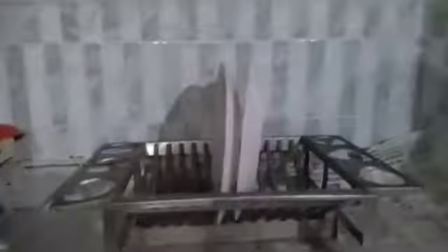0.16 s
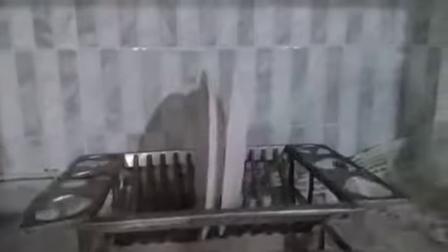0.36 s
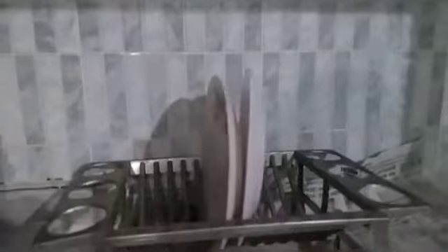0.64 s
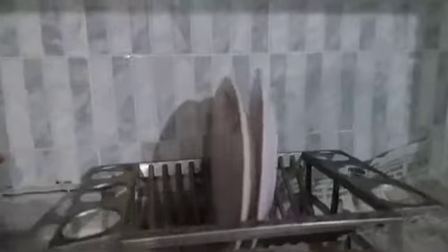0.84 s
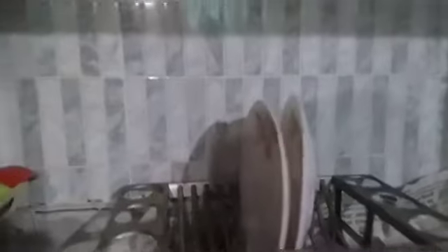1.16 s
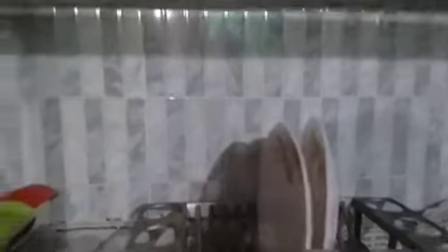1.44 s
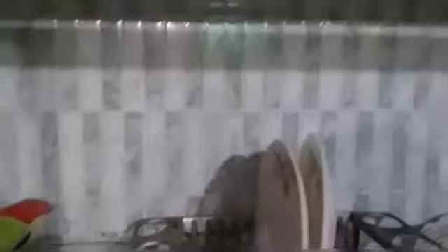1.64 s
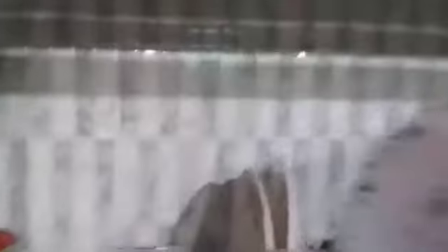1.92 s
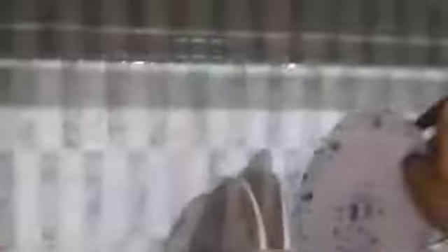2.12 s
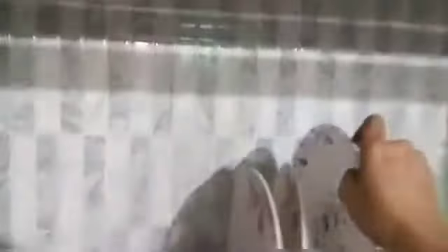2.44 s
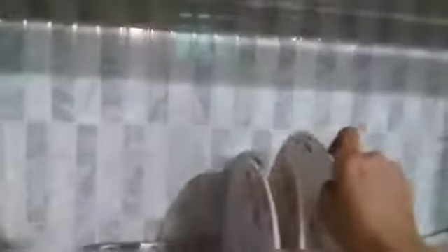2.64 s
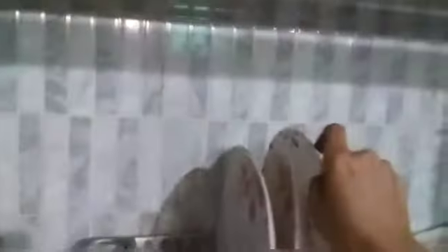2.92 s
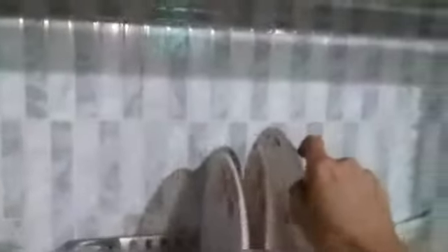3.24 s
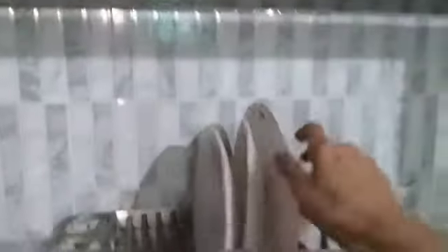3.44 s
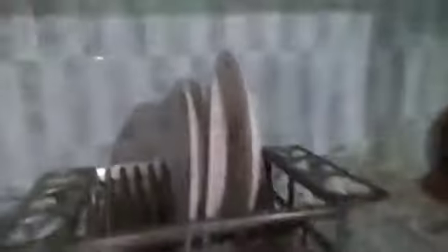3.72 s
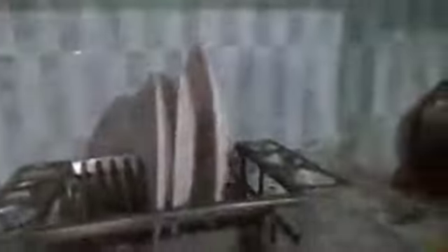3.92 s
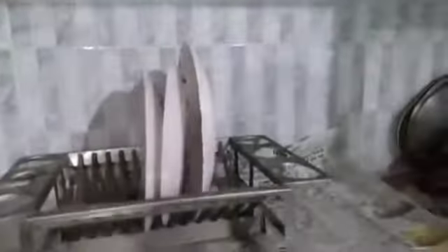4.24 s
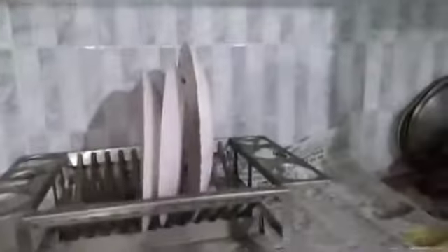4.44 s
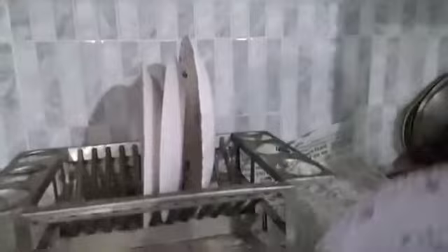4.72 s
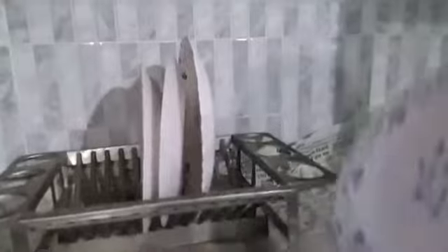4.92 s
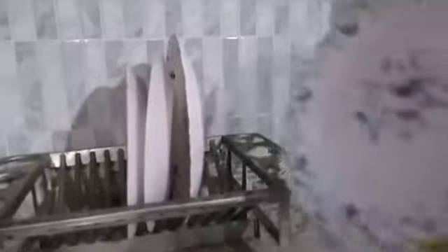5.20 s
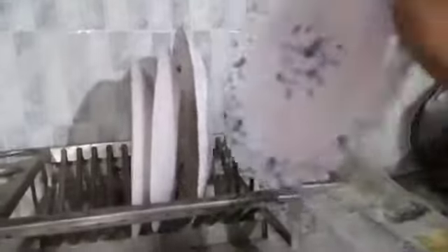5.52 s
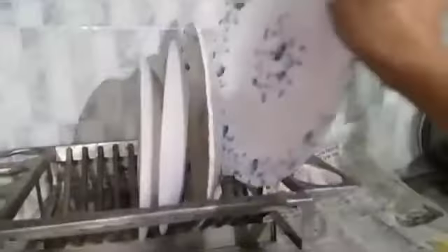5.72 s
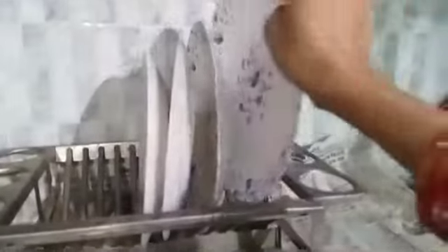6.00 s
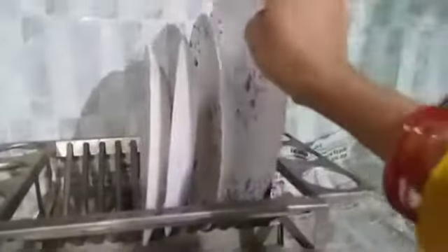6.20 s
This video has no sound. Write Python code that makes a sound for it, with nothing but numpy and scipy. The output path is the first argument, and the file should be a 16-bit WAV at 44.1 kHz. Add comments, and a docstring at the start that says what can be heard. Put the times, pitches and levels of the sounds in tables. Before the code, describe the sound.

China plates clatter and scrape into a steel dish rack in a small kitchen, with light clinks of glass bangles.

```python
"""Racking plates in a small tiled kitchen

Close up, plates come off a pile and go into a steel rack. China, steel and glass bangles clink:
each knock chatters briefly and rings the piece's modes. Wet plates scrape in dense little slips.
Far off are hollow thuds, a horn and a few faint tones, over town murmur and a low hum."""
import sys
import numpy as np
from scipy import signal
from scipy.fft import rfft, irfft, next_fast_len
from scipy.io import wavfile
from scipy.ndimage import uniform_filter1d

SR = 44100
rng = np.random.default_rng(int(sys.argv[2]) if len(sys.argv) > 2 else 0)


def store_wav(level_fs):
    """Save 16-bit WAV to argv[1]."""
    pcm = np.round(np.clip(np.atleast_2d(level_fs), -1, 1) * 32767)
    wavfile.write(sys.argv[1], SR, pcm.T.astype(np.int16))


N = 280764

# spectrum of the murmur and hiss: frequency_hz, relative_db
AIR_SPECTRUM = [(12, -54), (20, -30.5), (59, -13), (92, 0), (208, -16.5), (238, -12), (618, -12),
                (769, -21), (2160, -28), (3080, -29.5), (3830, -29.5), (12400, -37.5), (13400, -30.5)]
# noise bands of the hum: centre_hz, width_hz, level_db
HUM_BANDS = [(100.9, 30, -64.5), (149, 14, -67), (204.6, 20, -65.5)]
# light knocks: start_s, peak_db, ring_over_clatter_db, clatter_tilt_db_per_octave
BANGLE_HITS = [(0.0428, -43, 3, 5), (0.0641, -27, 8, 1), (0.5077, -19, 3.1, 4), (0.531, -17, 5, 1.5),
               (0.7175, -36, 3, 5), (1.9909, -50, 12.5, -7.5), (5.3426, -40, 16, -3.7),
               (5.3599, -39.5, -5.4, 1.7), (5.393, -34, 4, 1.5)]
STEEL_HITS = [(0.2614, -49, -21, 7), (0.311, -45, -21, 7), (0.3621, -39, -23, 8), (0.4244, -50, -17, -35),
              (0.4823, -32, 2, 7), (0.8069, -19, -4.5, -0.9), (0.821, -8, -3, 1.7),
              (0.9005, -18.5, -3, -1.13), (0.9453, -20, -4, -1.5), (1.0587, -31.5, -4.5, -0.1),
              (3.8942, -60.5, 4, -0.5), (4.8552, -34, -7, 0.5), (4.9821, -31.5, -8, 1.3)]
SAUCER_HITS = [(1.199, -9.5, 4.9, -0.6), (1.26, -8, 1.7, -4), (1.34, -19, 1.1, -4.5),
               (1.371, -12.5, 0.15, -4), (3.349, -36, -2.5, -4), (3.362, -34, 2, -3),
               (3.387, -37, -0.5, -5.5)]
RIM_HITS = [(4.236, -32.5, 8.5, -2.5), (4.248, -36.5, -0.5, -6.5), (4.387, -48, 6, 3)]
# knocks on damped plates: the same four columns, then favoured_mode_hz, ring_time_ratio
PILE_HITS = [(1.41, -2, 3.8, -4, 3500, 0.26), (1.426, -2, -3.3, -3, 3460, 0.8),
             (1.442, 0, 1.3, -9, 2180, 0.14), (1.474, -5.5, 7, -2, 1120, 0.33),
             (1.489, -6.5, -8, -5.5, 910, 0.9), (1.529, -11, 2, -5, 1950, 0.54),
             (1.593, -14.5, -2, -7, 3280, 0.4), (1.636, -10.5, 0.5, -5, 3120, 0.33),
             (1.704, -15.5, 3.5, -4, 1945, 0.82), (4.446, -31.5, -3.5, -9.5, 1105, 0.34),
             (4.619, -24, -1.5, -6.5, 1120, 0.3)]
LARGE_PLATE_HITS = [(2.83, -11.5, -0.5, -2, 3550, 0.85), (2.933, -17.5, -2.5, -4.5, 1960, 0.4),
                    (2.978, -16.5, 1, -4, 205, 0.27), (5.9995, -8.5, 7.5, 0.5, 1105, 0.68),
                    (6.103, -9.5, 7.5, -1.5, 1105, 0.85), (6.169, -4.5, 1.5, -2.5, 1960, 0.26),
                    (6.219, -12.5, -5, -5, 1960, 0.5), (6.286, -18, 0.5, -5, 1960, 0.5),
                    (6.337, -19.5, 3, -5.5, 1960, 0.33)]
# ringing modes of each piece: pitch_hz, relative_db, free_t60_s
BANGLE_MODES = [(4660, -7, 0.054), (7650, -2, 0.035), (7780, 3, 0.038), (8280, 5.5, 0.099), (9060, -5, .06),
                (9130, -0.5, 0.052), (12400, 7, 0.1), (12610, 1.5, 0.054)]
STEEL_MODES = [(2114, -5.5, 0.087), (4180, -2.5, 0.089), (5300, 4.5, .04), (8250, -4, 0.036),
               (8980, -3, 0.092), (11220, -13.5, 0.044)]
SAUCER_MODES = [(224, -15, 0.18), (776.8, -3.5, 0.087), (976, -7, 0.096), (1528, 7.5, 0.017),
                (2060, -2, 0.05), (2670, -7, 0.055), (3438, -5, .05), (4150, -7.5, .04), (4947, -2, .04),
                (5540, -13, 0.049)]
PILE_MODES = [(129, -20.5, 0.17), (219, -16, 0.16), (694, -19.5, .15), (873, -10, 0.15), (1137, -8, 0.27),
              (1536, -10, 0.17), (1982, -3, 0.18), (2200, -7.5, 0.14), (2588, -9.5, .12), (2870, -6, 0.077),
              (3096, -1.5, 0.15), (3357, -1, 0.044), (3677, -8.5, 0.11), (4157, -4.5, 0.17),
              (4740, -3.5, .12), (5620, -8, 0.073)]
LARGE_PLATE_MODES = [(200.8, -18.5, 0.074), (95.96, -23.5, .2), (1097, -10, 0.21), (1501, -20, 0.12),
                     (1956, 0.5, 0.12), (2217, -3.5, 0.055), (2590, 2.5, 0.037), (3203, 1, 0.11),
                     (3646, 1, 0.04), (4250, 2, 0.049), (4800, 0.5, 0.062), (5250, -1, 0.064),
                     (5850, -5.5, 0.051), (6880, -21, 0.13)]
RIM_MODES = [(1090, -8, 0.15), (2445, -10.5, 0.31), (3130, -9, 0.26), (3610, -6, 0.14), (4600, -4, 0.13),
             (5280, 2, 0.074), (6760, -11.5, 0.082), (8200, -10, 0.13), (8800, -9, 0.11),
             (11400, -24, 0.092)]
# rubbing strokes: start_s, strongest_s, end_s, level_db, bright_fraction
SCRAPE_STROKES = [(0.145, 0.42, 1.1, -61, 1), (0.467, 0.585, 0.78, -36.5, .8),
                  (0.913, 0.95, 0.96, -34.5, 1), (1.005, 1.062, 1.39, -48, 0.96),
                  (3.18, 3.235, 5.2, -65.5, 0.9), (3.3, 3.503, 3.61, -64, 0.76),
                  (4.357, 4.438, 4.48, -53, 0.66), (4.468, 4.539, 4.67, -39, 0.63),
                  (4.573, 4.596, 4.7, -45, 0.54), (4.68, 4.724, 4.808, -43, 0.44),
                  (4.741, 4.825, 4.91, -43, 0.08), (4.947, 5.03, 5.036, -45, 0.43)]
# resonances of a rubbed plate: centre_hz, width_hz, relative_db
SCRAPE_RESONANCES = [(900, 150, -1.5), (1880, 33, 2.5), (3200, 130, -11), (4000, 330, -10),
                     (4240, 280, -10.5), (5370, 86, -10.5)]
# far blows: start_s, peak_db, hollow_hz, t60_s
THUD_HITS = [(.40, -47, 685, 0.33), (2.321, -30, 428, 0.47), (3.743, -31, 522, 0.49),
             (3.899, -41.5, 347, 0.37)]
# the one horn call: start_s, release_start_s, level_db
HORN_CALL = 1.79, 2.69, -62.5
# the horn's upper partials: harmonic_number, relative_db
HORN_PARTIALS = [(6, -0.5), (7, 1), (8, -10.5)]
# faint wavering tones: start_s, end_s, pitch_hz, level_db
FAINT_TONES = [(5.2, 5.6, 1863, -68), (5.35, 5.8, 608, -66), (5.15, 5.4, 818, -75), (5.54, 5.64, 2272, -74)]
# decay of the kitchen's reverb: frequency_hz, t60_s
ROOM_DECAY = [(100, 1), (500, 0.32), (2000, .36), (6000, 0.34), (13000, 0.064)]
# the band that leans left: centre_hz, width_hz, side_db
LEFT_BAND = 1950, 600, -12


def undb(db):
    return np.exp(np.asarray(db) * np.log(10) / 20)


def unit_rms(x):
    return x / np.sqrt(np.mean(x ** 2))


def equalise(x, gain):
    """Filter by a gain that is a function of frequency."""
    n = next_fast_len(len(x))
    hz = np.maximum(np.arange(n // 2 + 1) * SR / n, 1.)
    return irfft(rfft(x, n) * gain(hz), n)[:len(x)]


def noise(length, gain):
    return equalise(rng.standard_normal(length), gain)


def tilt(hz, slope_db, low_hz=330):
    """A slope per octave about 2 kHz; small bodies radiate little bass."""
    slope = undb(slope_db * np.log2(np.maximum(hz, 900) / 2000))
    return slope / (1 + (low_hz / hz) ** 2) / (1 + (90 / hz) ** 2)


def resonance(hz, centre_hz, width_hz):
    return 1 / np.sqrt(1 + (2 * (hz - centre_hz) / width_hz) ** 2)


def wander(rate_hz):
    """A random modulator: stepped levels, smoothed twice."""
    hold = int(SR / rate_hz)
    steps = np.repeat(rng.standard_normal(N // hold + 1), hold)
    return uniform_filter1d(uniform_filter1d(steps, hold), hold)[:N]


def place(out, start_s, sound, peak_db):
    i = int(start_s * SR)
    out[i:i + len(sound)] += sound[:N - i] * undb(peak_db) / abs(sound).max()


def ambience(bed_db=-63):
    """The bed: town murmur and microphone hiss, with a rough low hum."""
    hz, db = np.transpose(AIR_SPECTRUM)
    bed = unit_rms(noise(N, lambda f: undb(np.interp(np.log(f), np.log(hz), db))))
    hum = sum(undb(level_db) * unit_rms(noise(N, lambda f: resonance(f, centre, width) ** 2))
              for centre, width, level_db in HUM_BANDS)
    return undb(bed_db + 0.5 * wander(9)) * bed + hum


def knocks(hits, modes, top_hz, split, chatter_s, low_hz=330, spot_db=2, favour_db=9, attack_s=.003):
    """A touch and a short chatter ring the body's modes and are heard themselves as clatter."""
    out, t = np.zeros(N), np.arange(SR // 3) / SR
    hz, db, t60 = np.repeat(modes, repeats=3, axis=0).T[:, :, None]
    attack = 1 - np.exp(-t / attack_s)
    fade = np.clip((t[-1] - t) / .1, 0, 1)
    for start_s, peak_db, ring_db, slope_db, *grip in hits:
        favoured_hz, ring_time_ratio = grip or (1, 1)
        touch = rng.standard_normal(len(t)) * undb(-60 * t / 0.005)
        chatter = rng.standard_normal(len(t)) * undb(-60 * t / chatter_s) * attack
        # no piece is quite round or struck twice on one spot: modes split and share the blow anew
        detune, spot, phase = rng.standard_normal((3,) + hz.shape)
        mode_db = db + spot_db * spot + favour_db * resonance(hz, favoured_hz, .12 * favoured_hz) ** 2
        damped_t60 = np.clip(ring_time_ratio * t60, .02, .33)  # hands and neighbours damp the ring
        partials = np.sin(2 * np.pi * (hz * (1 + split * detune) * t + phase))
        ping = (partials * undb(mode_db - 60 * t / damped_t60)).sum(axis=0)
        ring = ping * attack + 0.044 * signal.fftconvolve(chatter, ping)[:len(t)]
        contact = 1.44 * touch + chatter
        clatter = equalise(contact, lambda f: tilt(f, slope_db, low_hz) / (1 + (f / top_hz) ** 4))
        place(out, start_s, (unit_rms(clatter) + undb(ring_db) * unit_rms(ring)) * fade, peak_db)
    return out


def bangles():
    """Glass bangles tap together: tiny, high, tight ticks."""
    return knocks(BANGLE_HITS, BANGLE_MODES, top_hz=16220, split=.02, chatter_s=0.016)


def scrapes(slip_db=1.3, ring_db=11, rise_db=17, fall_db=17.5):
    """Dense slips of china on china, dull or bright with pressure, ring the plate faintly."""
    out, t = np.zeros(N), np.arange(N) / SR
    slips = rng.standard_normal(N) * undb(slip_db * (wander(56) + 2.5 * wander(400)))
    body = equalise(slips, lambda f: 1 + sum(undb(db + ring_db) * resonance(f, hz, width)
                                             for hz, width, db in SCRAPE_RESONANCES))
    dull = unit_rms(equalise(body, lambda f: tilt(f, slope_db=-5)))
    bright = unit_rms(equalise(body, lambda f: tilt(f, slope_db=2)))
    for start, strongest, end, db, brightness in SCRAPE_STROKES:
        stroke_db = np.interp(t, (start, strongest, end), (db - rise_db, db, db - fall_db), -200, -200)
        out += undb(stroke_db) * ((1 - brightness) * dull + brightness * bright)
    return out


def steel_ware():
    """Knocked steel gives a bright clash of widely split modes."""
    return knocks(STEEL_HITS, STEEL_MODES, top_hz=13800, split=0.038, chatter_s=0.063)


def far_thuds(hollow_db=8, attack_s=0.03, lead_s=.012):
    """Blows in another room: a slow, hollow swell whose treble dies first."""
    out, t = np.zeros(N), np.arange(SR) / SR
    for start_s, peak_db, hz, t60 in THUD_HITS:
        hollow = noise(SR, lambda f: 1 + undb(hollow_db) * resonance(f, hz, .5 * hz) ** 2)
        low = equalise(hollow, lambda f: 1 / (1 + (f / 800) ** 4) / (1 + (130 / f) ** 2))
        high = noise(SR, lambda f: .5 / (1 + (f / 2000) ** 8) / (1 + (800 / f) ** 2))
        blow = low * undb(-60 * t / t60) + high * undb(-110 * t / t60)
        place(out, start_s - lead_s, (1 - np.exp(-t / attack_s)) * blow, peak_db)
    return out


def saucer():
    """A small plate is knocked: a short, hard clack."""
    return knocks(SAUCER_HITS, SAUCER_MODES, top_hz=9200, split=0.0085, chatter_s=0.039)


def plate_pile():
    """Plates crash on plates and rack, choking each other's ring."""
    return knocks(PILE_HITS, PILE_MODES, top_hz=10000, split=.018, chatter_s=0.083)


def far_horn(pitch_hz=446, attack_s=.35, release_s=0.61, waver_db=6):
    """A distant horn's upper partials, each wavering as its echoes beat."""
    t = np.arange(N) / SR
    start, end, db = HORN_CALL
    envelope = undb(db) * np.interp(t, (start, start + attack_s, end, end + release_s), (0, 1, 1, 0))
    partials = (undb(partial_db + waver_db * wander(65)) * np.sin(2 * np.pi * harmonic * pitch_hz * t)
                for harmonic, partial_db in HORN_PARTIALS)
    return envelope * sum(partials)


def large_plate():
    """A large plate rattles in between the rack's bars, with more bass in its clatter."""
    return knocks(LARGE_PLATE_HITS, LARGE_PLATE_MODES, top_hz=9400, split=0.01367, chatter_s=0.1,
                  low_hz=175)


def plate_rim():
    """A light touch on a plate's rim leaves a clear, lingering ring."""
    return knocks(RIM_HITS, RIM_MODES, top_hz=11850, split=0.0051, chatter_s=0.15)


def faint_tones(waver_db=6):
    """Far tones swell and fade, wavering as their echoes beat."""
    out, t = np.zeros(N), np.arange(N) / SR
    for start, end, hz, db in FAINT_TONES:
        swell = np.sin(np.pi * np.clip((t - start) / (end - start), 0, 1))
        out += swell * undb(db + waver_db * wander(59)) * np.sin(2 * np.pi * hz * t)
    return out


def tiled_reverb(sound, build_s=0.0042):
    """Echoes off the tiled walls: a tail of octave noise bands, each with its own decay."""
    tail, t = np.zeros(SR), np.arange(SR) / SR
    hz, t60 = np.transpose(ROOM_DECAY)
    for centre in 60 * 2. ** np.arange(9):
        band = noise(SR, lambda f: np.cos(np.pi / 2 * np.clip(np.log2(f / centre), -1, 1)))
        tail += band * undb(-60 * t / np.interp(np.log(centre), np.log(hz), t60))
    tail *= 1 - np.exp(-t / build_s)
    return signal.fftconvolve(sound, tail / np.sqrt(np.sum(tail ** 2)))[:N]


def scene(reverb_db=-5.5, side_echo_db=-17, side_hiss_db=-6):
    """Close dishes and their reverb over the distant layers, mixed as mid and side."""
    near = bangles() + scrapes() + steel_ware() + saucer() + plate_pile() + large_plate() + plate_rim()
    far = ambience() + far_thuds() + far_horn() + faint_tones()
    mid = near + undb(reverb_db) * tiled_reverb(near) + far
    # stereo width: a band near 1950 Hz leans left; faint treble reverb and hiss spread wide
    lean_hz, width_hz, lean_db = LEFT_BAND
    lean = equalise(mid, lambda f: resonance(f, lean_hz, width_hz) ** 4)
    echoes = equalise(tiled_reverb(near), lambda f: 1 / (1 + (5000 / f) ** 8))
    hiss = equalise(ambience(), lambda f: 1 / (1 + (1800 / f) ** 2) / (1 + (900 / f) ** 8))
    side = undb(lean_db) * lean + undb(side_echo_db) * echoes + undb(side_hiss_db) * hiss
    return np.array([mid + side, mid - side])


def record(dry, top_hz=13400):
    """The phone cuts the top end and hard-limits the loudest crash."""
    lowpass = signal.ellip(10, .2, 60, top_hz, fs=SR, output="sos")
    return np.clip(signal.sosfilt(lowpass, np.clip(dry, -1, 1)), -1, 1)


dry = scene()
out = record(dry)
store_wav(out)
```